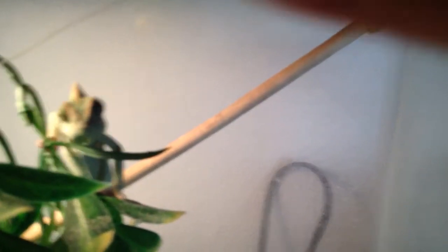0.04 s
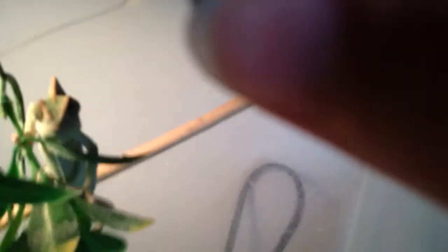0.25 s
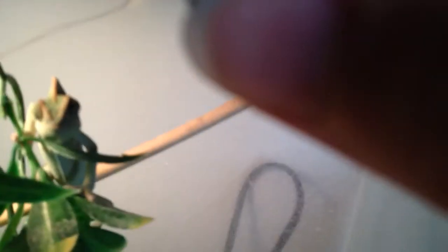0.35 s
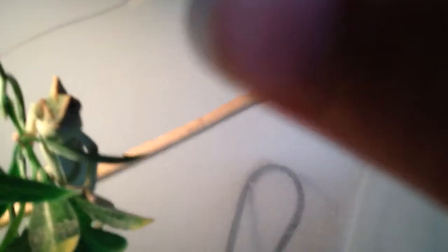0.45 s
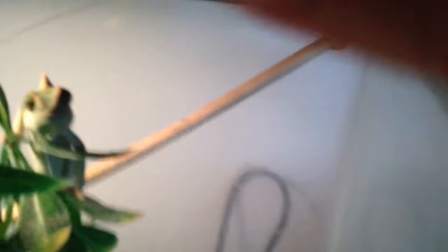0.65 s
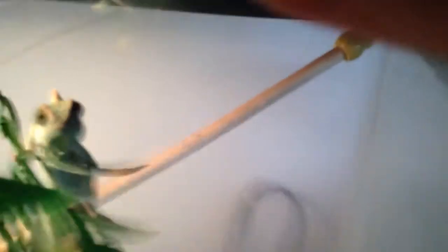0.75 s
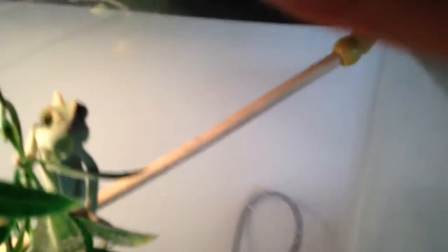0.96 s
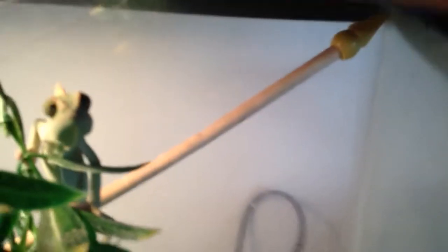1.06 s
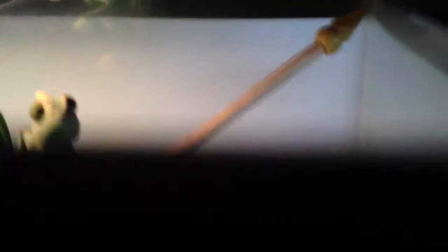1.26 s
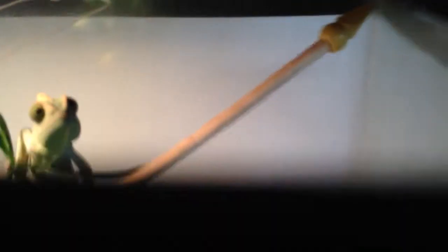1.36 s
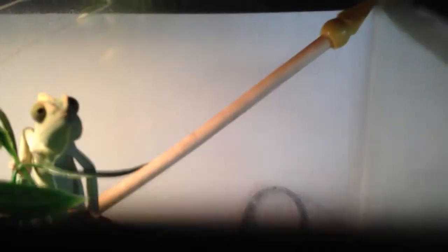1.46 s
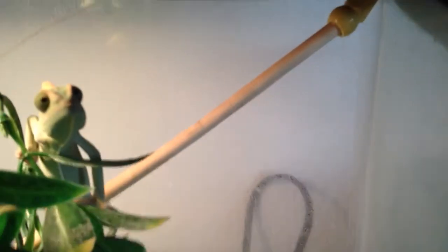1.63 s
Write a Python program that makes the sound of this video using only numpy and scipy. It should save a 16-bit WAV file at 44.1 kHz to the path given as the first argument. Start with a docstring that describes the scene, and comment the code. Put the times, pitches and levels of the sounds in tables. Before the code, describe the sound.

Close handling knocks on a camera body in a quiet room: a sharp click with a thump, a softer tap, a loud double knock, then a lighter one. Faint rubbing, low rumble and small metal ticks fill the gaps.

```python
"""A quiet room, close up on a small camera being handled.
Fingers knock on the case, which rings and thumps; padded contacts bump it and its plastic seams snap.
A tiny metal part ticks and rings close to the microphone.
Low resonances set off by the knocks rumble and murmur; skin rubs on the case over faint room noise."""
import sys
import numpy as np
from scipy import signal
from scipy.fft import rfft, irfft, next_fast_len
from scipy.io import wavfile

SR = 44100
rng = np.random.default_rng(int(sys.argv[2]) if len(sys.argv) > 2 else 0)


def log_audio(samples):
    """Write samples as a 16-bit WAV file to the path given in sys.argv[1]."""
    # one column per channel
    frames = np.atleast_2d(samples).T
    # limit to full scale, then quantise
    limited = np.clip(frames, -1, 1)
    pcm = np.round(limited * 32767).astype(np.int16)
    wavfile.write(sys.argv[1], SR, pcm)


N = 74970

# Finger knocks: t/s, level/dB, bass corner f/Hz, treble corner f/Hz, ring re knock/dB,
# thump level/dB, thump f/Hz, room re knock/dB
FINGER_KNOCKS = [(0.2427, -12.5, 80, 2370, -22, -53, 110, -1),
                 (0.2453, 2, 69, 1280, -10, -30.5, 164.6, -11),
                 (0.5764, -10.5, 187, 1800, 1.5, -30.5, 153.4, 0.5),
                 (0.7803, -2, 200, 2130, 3.5, -34.5, 160.4, -15),
                 (0.8042, 5.5, 312, 1700, -1, -42.5, 207, -25),
                 (1.0630, -4, 148, 2260, -4.5, -34.5, 170.6, -10.5)]
# Spectrum of a knock before its corners: f/Hz, level/dB
KNOCK_SPECTRUM = [(40, -14), (120, 4), (320, 3), (540, -4), (900, 1), (1200, -1), (1550, -3.5), (2150, 0.5),
                  (2600, -6.5), (4000, -11), (8000, -6), (15000, -12.5)]
# Modes of the case: f/Hz, level/dB, t60/s
CASE_MODES = [(334, -47.5, 0.052), (420, -50, 0.026), (762, -41, 0.034), (935, -42.5, 0.056),
              (1052, -49, 0.035), (1240, -61, 0.033), (1520, -46, 0.025)]
def knocks():
    """A finger strikes the case: a dull pulse, contact chatter, ringing modes and a low thump."""
    chatter_db, ring_attack_s, thump_attack_s = -9.5, 0.00055, 0.00036
    out, t = np.zeros(N), clock(SR // 4)
    for s, db, bass_hz, treble_hz, ring_db, thump_db, thump_hz, room_db in FINGER_KNOCKS:
        def spectrum(hz):
            bass_cut = rolloff(bass_hz / (hz + 1), order=2)
            treble_cut = rolloff(hz / treble_hz, order=4, floor_db=-29)
            return along(KNOCK_SPECTRUM, hz) + bass_cut + treble_cut
        blow = amp(db) * case_pulse(spectrum, smear_hz=1500)
        chatter = rng.standard_normal(len(t)) * fade(t, t60=0.014)
        modes = ring(CASE_MODES, t, spread_db=5) * swell(t, ring_attack_s)
        thump = -np.cos(2 * np.pi * thump_hz * t) * fade(t, t60=0.082)
        add(out, s, blow)
        add(out, s, amp(chatter_db) * signal.fftconvolve(blow, chatter / np.linalg.norm(chatter)))
        add(out, s, amp(db + ring_db) * modes)
        add(out, s, amp(thump_db) * thump * (1 - np.exp(-t / thump_attack_s)))
        add(out, s, amp(room_db) * room_tail(blow))
    return out


# The case shifting in the hand: t/s, level/dB, f/Hz, rise/s, t60/s
SOFT_BUMPS = [(.076, -62, 480, 0.0052, 0.077), (0.242, -34, 106, 0.0027, 0.057),
              (0.2663, -28.5, 178.5, 0.006, 0.071), (0.314, -31, 155, 0.0079, 0.066),
              (0.601, -39, 187, 0.0055, 0.087), (0.684, -43.5, 128, .008, 0.11),
              (.7015, -43, 535, 0.0014, 0.024), (0.986, -54.5, 394, 0.0066, .08),
              (1.086, -27.5, 175, 0.0035, 0.037), (1.258, -42.5, 218, 0.0054, 0.11),
              (1.3065, -59, 835, 0.0022, .04), (1.321, -48, 207, 0.0078, 0.1)]
# Grit in a bump: multiple of its pitch, level/dB
GRIT_SPECTRUM = [(.2, -18), (.6, 2), (1, 9), (1.6, -1.5), (3, -17), (8, -37)]
def bumps():
    """Padded contacts swell softly into one low, slightly gritty note."""
    grit_db = -10.5
    out, t = np.zeros(N), clock(SR // 4)
    for s, db, hz, rise, t60 in SOFT_BUMPS:
        grit = amp(grit_db) * noise([(k * hz, level) for k, level in GRIT_SPECTRUM])[:len(t)]
        note = np.sin(2 * np.pi * hz * t)
        add(out, s, amp(db) * swell(t, rise) * fade(t, t60) * (note + grit))
    return out


# Plastic seams snapping: t/s, level/dB, centre f/Hz, treble corner f/Hz
SEAM_SNAPS = [(0.253, -4, 5000, 16200), (.25287, -8, 5350, 14300), (.2604, -10, 5400, 8500),
              (.2655, -18.5, 5700, 8000), (0.8042, -4.5, 3730, 12700), (0.814, -24, 4800, 7000),
              (0.816, -25, 5000, 7000), (0.8211, -25, 5050, 7000), (0.822, -32, 4700, 7000),
              (0.894, -41, 6150, 13400), (1.0744, -29.5, 5800, 10100)]
# Spectrum of a snap centred on reference_hz: f/Hz, level/dB
SNAP_SPECTRUM = [(200, -30), (1800, -18), (3600, -3.5), (4500, -2.5), (5400, 3), (6800, -1.5), (7800, -8),
                 (9500, -7), (11500, -13), (15000, -11), (22000, -21)]
def snaps():
    """The seams let go in single bright pulses, and the room answers faintly."""
    reference_hz, room_db = 5600, -15
    out = np.zeros(N)
    for s, db, centre_hz, treble_hz in SEAM_SNAPS:
        def spectrum(hz):
            return along(SNAP_SPECTRUM, hz * reference_hz / centre_hz) + rolloff(hz / treble_hz, order=4)
        snap = amp(db) * case_pulse(spectrum, smear_hz=4600)
        add(out, s, snap)
        add(out, s, amp(room_db) * room_tail(snap))
    return out


# Ticks close to the microphone: t/s, level/dB, tuning ratio of the modes, rasp re tick/dB
METAL_TICKS = [(0.3137, -38, 1.01, -17.5), (.3700, -60.5, 1.6, -2), (0.385, -48.5, 1.2, -8.5),
               (0.5317, -43.5, 0.95, -19.5), (0.7789, -38.5, 1.16, -22), (1.1144, -55, 1.28, -13),
               (1.233, -41, 1, -40), (1.306, -67.5, 0.93, -7), (1.4950, -56, 0.95, -32),
               (1.5692, -45, 0.94, -34)]
# Modes of the metal part at tuning 1: f/Hz, level/dB, t60/s
METAL_MODES = [(6630, -0.5, 0.038), (6940, -4, .045), (7780, -13, 0.13), (8240, -9, 0.053),
               (9060, -2, 0.049), (9300, -4, 0.02), (10320, -9, 0.026), (10800, -5, 0.025),
               (10230, -6.5, 0.038), (12600, -15, 0.017), (13100, -9, 0.047), (14850, -19, 0.039)]
# Its bright scrape and its lower rasp: f/Hz, level/dB
SCRAPE_SPECTRUM = [(500, -11), (4000, -22), (5900, -14), (6700, 6), (8200, -11), (11000, -0.5),
                   (13500, -23), (15000, -8.5)]
RASP_SPECTRUM = [(300, -26), (1000, -2), (2600, -5), (3400, -2.5), (3850, 9), (4400, -6), (5500, -24),
                 (12000, -38)]
def ticks():
    """The metal part scrapes and rasps for a moment and rings on, unsteadily."""
    scrape_db, ring_db, rise_s = -3, -9.5, 0.0016
    out, t = np.zeros(N), clock(SR // 6)
    for s, db, tuning, rasp_db in METAL_TICKS:
        friction = amp(scrape_db) * noise(SCRAPE_SPECTRUM) + amp(rasp_db) * noise(RASP_SPECTRUM)
        scrape = friction[:len(t)] * fade(t, t60=0.057)
        metal = amp(ring_db) * ring(METAL_MODES, t, spread_db=1, tuning=tuning, waver=0.04)
        add(out, s, amp(db) * swell(t, rise_s) * (scrape + metal))
    return out


# Course of the resonances' deep rumble and of their hollow murmur: t/s, level/dB
RUMBLE_LEVELS = [(0, -71.5), (.19, -82), (.245, -55), (.335, -44.5), (.40, -62.5), (.49, -61), (.67, -57.5),
                 (.75, -92), (.82, -60), (1.01, -70), (1.10, -58), (1.23, -66.5), (1.28, -67),
                 (1.40, -78.5), (1.48, -60), (1.56, -78), (1.7, -70)]
MURMUR_LEVELS = [(0, -83.5), (.09, -70.5), (.16, -67.5), (.23, -58), (.27, -43), (.33, -57), (.40, -56.5),
                 (.50, -64.5), (.56, -67), (.61, -56.5), (.70, -57), (.75, -67), (.83, -60), (.96, -68),
                 (1.05, -59.5), (1.11, -54.5), (1.23, -66), (1.29, -66), (1.42, -61.5), (1.55, -67.5),
                 (1.63, -61.5), (1.7, -68)]
# Noise in the rumble and in the murmur: f/Hz, level/dB
RUMBLE_SPECTRUM = [(20, -7), (40, -27), (60, -6), (76, 26.5), (95, -8), (125, 6), (220, -42.5)]
MURMUR_SPECTRUM = [(40, -51), (95, -9), (125, -2.5), (165, -3), (215, 4), (250, -6), (282, -8.5),
                   (330, -19), (380, -18.5), (420, -8.5), (480, -26.5), (600, -44), (1500, -48)]
def low_resonances():
    """Low resonances, set off by the knocks, rumble and murmur, then die away."""
    resonance_hz, noise_db = 77.13, -8.5
    resonance = np.sin(2 * np.pi * (resonance_hz * clock() + drift(N, waver=0.0076)))
    rumble = resonance + amp(noise_db) * noise(RUMBLE_SPECTRUM)
    return contour(RUMBLE_LEVELS) * rumble + contour(MURMUR_LEVELS) * noise(MURMUR_SPECTRUM)


# Strokes of skin: peak t/s, rustle level/dB, hiss level/dB, rise/s, fall/s
SKIN_STROKES = [(0.167, -60.5, -72.5, 0.042, 0.085), (.30, -63.5, -70.5, 0.062, 0.14),
                (0.554, -58.5, -84, 0.015, 0.011), (0.588, -57.5, -64, 0.017, 0.068),
                (0.707, -64, -102, 0.02, 0.022), (0.843, -59, -65.5, 0.057, 0.036),
                (.918, -68.5, -72, 0.0054, 0.012), (1.014, -71, -68, 0.045, 0.043),
                (1.132, -60.5, -82, 0.034, 0.03), (1.264, -66.5, -73, 0.016, 0.024),
                (1.312, -70, -78, 0.012, 0.023), (1.448, -69.5, -73, 0.041, 0.1),
                (1.59, -76, -93, 0.022, 0.11)]
# Their low rustle and their hiss: f/Hz, level/dB
RUSTLE_SPECTRUM = [(60, -7), (250, 2), (450, -2), (600, -5), (800, -0.5), (1100, -4), (1500, -9),
                   (2200, -12), (2900, -18.5), (6000, -33), (15000, -31)]
HISS_SPECTRUM = [(500, -38), (2600, -4.5), (4000, 0), (5600, -2), (8000, -4), (11500, -6), (15000, -4.5)]
def rubs():
    """Skin slides over the case in short strokes that rustle and hiss."""
    t, rustle, hiss = clock(), np.zeros(N), np.zeros(N)
    for s, rustle_db, hiss_db, rise, fall in SKIN_STROKES:
        stroke = np.exp(-np.where(t < s, ((t - s) / rise) ** 2, (t - s) / fall))
        rustle += amp(rustle_db) * stroke
        hiss += amp(hiss_db) * stroke
    return rustle * noise(RUSTLE_SPECTRUM) + hiss * noise(HISS_SPECTRUM)


# Decay of the room: f/Hz, t60/s
ROOM_DECAY = [(100, 0.12), (500, 0.24), (2000, 0.083), (12000, 0.085)]
def room_tail(sound, build_s=0.0013):
    """The room returns a short diffuse tail, drawn afresh for each sound."""
    hz, t, bands = signal.stft(rng.standard_normal(SR // 2), SR, nperseg=256)
    tail = signal.istft(bands * fade(t, along(ROOM_DECAY, hz)[:, None]), SR, nperseg=256)[1]
    tail *= 1 - np.exp(-clock(len(tail)) / build_s)
    return signal.fftconvolve(sound, tail / np.linalg.norm(tail))


# Room tone at the microphone: f/Hz, relative level/dB
ROOM_TONE_SPECTRUM = [(25, -20.5), (60, -3), (120, 1), (250, -9.5), (450, -7), (750, -13), (1500, -19.5),
                      (3500, -23), (7000, -25.5), (15500, -28.5)]
def room_tone(db=-71.5):
    """The still room: faint, steady noise, mostly bass."""
    return amp(db) * noise(ROOM_TONE_SPECTRUM)


def case_pulse(spectrum, smear_hz, size=4096):
    """A short pulse through the case, which notches one band and delays what lies below smear_hz."""
    notch_hz, width_hz, notch_db = 2643, 270, -8
    hz = np.fft.rfftfreq(size, 1 / SR)
    notch = notch_db * np.exp(-((hz - notch_hz) / width_hz) ** 2)
    cepstrum = irfft(np.log(amp(spectrum(hz) + notch)))
    cepstrum[1:size // 2] *= 2  # fold to minimum phase: the energy comes first
    cepstrum[size // 2 + 1:] = 0
    allpass = (1j * hz - smear_hz) / (1j * hz + smear_hz)
    return irfft(np.exp(rfft(cepstrum)) * allpass)


def ring(modes, t, spread_db, tuning=1, waver=0):
    """Decaying modes, each struck a little differently every time."""
    out = np.zeros(len(t))
    for hz, db, t60 in modes:
        envelope = amp(db + spread_db * rng.normal()) * fade(t, t60)
        out += envelope * np.sin(2 * np.pi * (tuning * hz * t + drift(len(t), waver)))
    return out


def drift(size, waver):
    """A wandering phase in cycles; waver is in cycles per root ms."""
    return rng.random() + waver * np.cumsum(rng.standard_normal(size)) / np.sqrt(SR / 1000)


def noise(spectrum):
    """Coloured noise of rms 1."""
    gain = amp(along(spectrum, np.fft.rfftfreq(N, 1 / SR)))
    coloured = irfft(rfft(rng.standard_normal(N)) * gain, N)
    return coloured / np.sqrt(np.mean(coloured ** 2) + 1e-20)


def rolloff(ratio, order, floor_db=-60):
    """Gain in dB of a filter slope that starts where ratio passes 1."""
    return 20 * np.log10(1 / (1 + ratio ** order) + amp(floor_db))


def along(points, hz):
    """Interpolate (f/Hz, value) points on a log axis."""
    f, values = np.transpose(points)
    return np.interp(np.log(hz + 1), np.log(f + 1), values)


def contour(points):
    """Gain at each sample from (t/s, level/dB) points."""
    return amp(np.interp(clock(), *np.transpose(points)))


def swell(t, rise_s):
    """Smooth onset from 0 to 1."""
    return 1 - np.exp(-(t / rise_s) ** 2)


def fade(t, t60):
    """Decay by 60 dB in t60 seconds."""
    return amp(-60 * t / t60)


def amp(db):
    """Decibels to gain."""
    return 10 ** (np.asarray(db) / 20)


def clock(size=N):
    """Time of each sample."""
    return np.arange(size) / SR


def add(track, s, sound):
    """Mix a sound into the track from time s."""
    i = round(s * SR)
    track[i:i + len(sound)] += sound[:N - i]


def scene():
    """Close handling sounds over the still room, in mono."""
    return (knocks() + bumps() + snaps() + ticks() + low_resonances() + rubs() + room_tone())[None]


def record(dry):
    """The camera keeps nothing above its band limit."""
    top_hz = 15300
    size = next_fast_len(N + SR // 2)
    passband = np.fft.rfftfreq(size, 1 / SR) < top_hz
    return irfft(rfft(dry, size) * passband, size)[:, :N]


dry = scene()
out = record(dry)
log_audio(out)
```